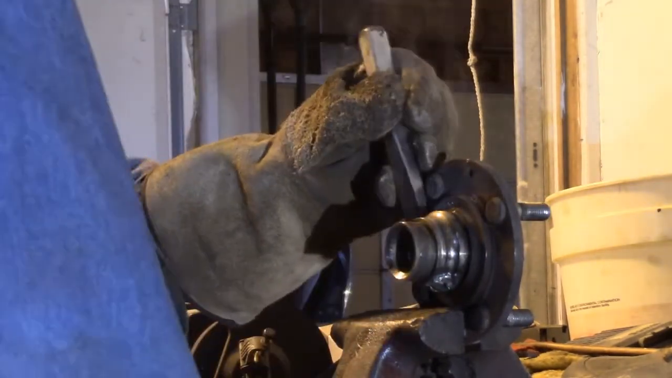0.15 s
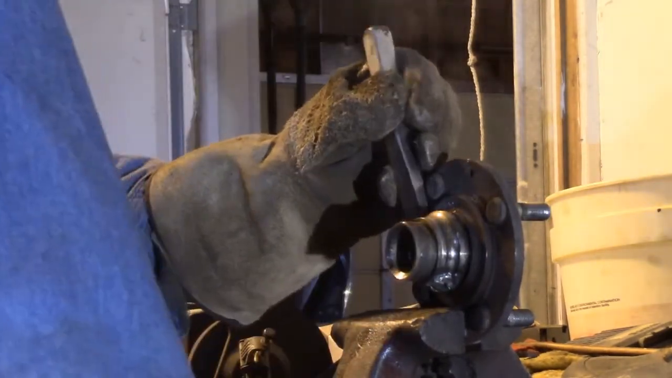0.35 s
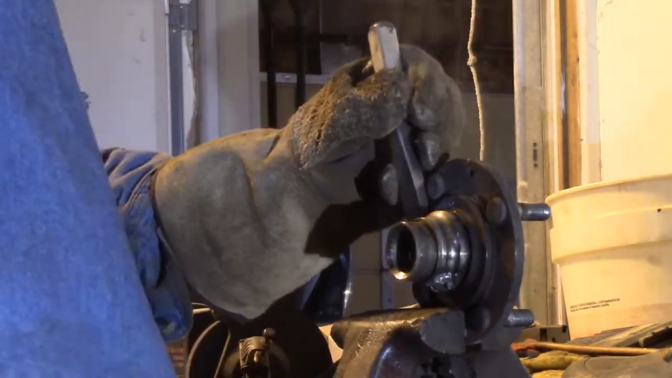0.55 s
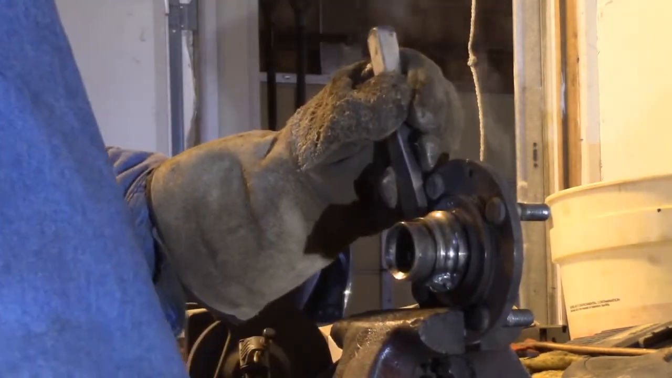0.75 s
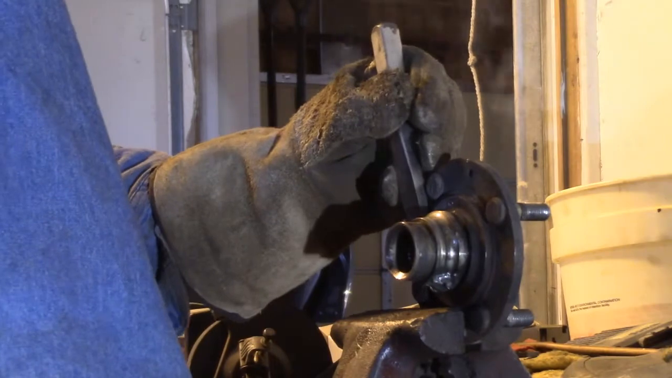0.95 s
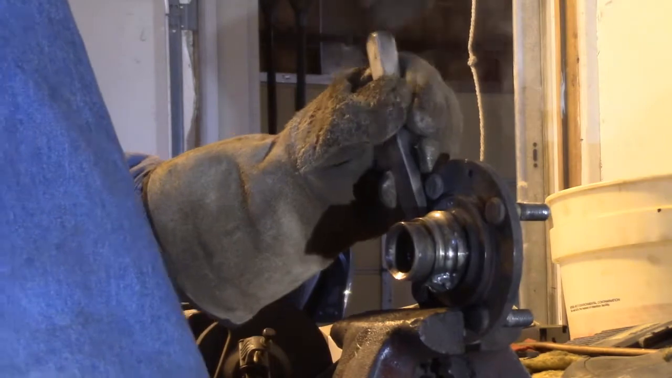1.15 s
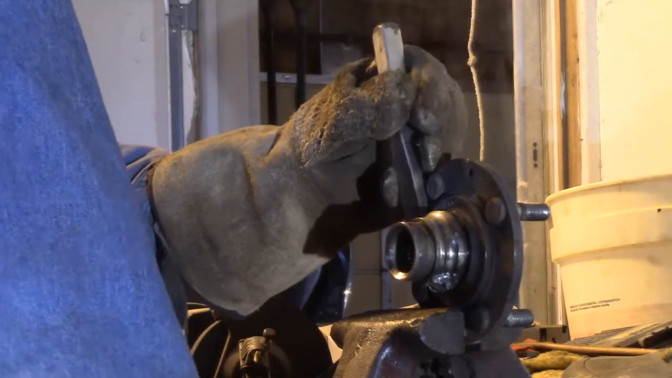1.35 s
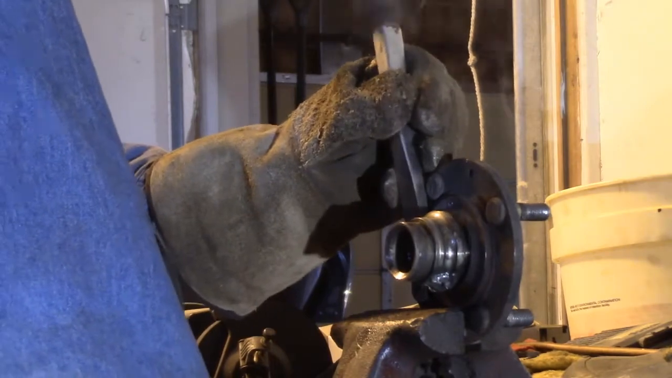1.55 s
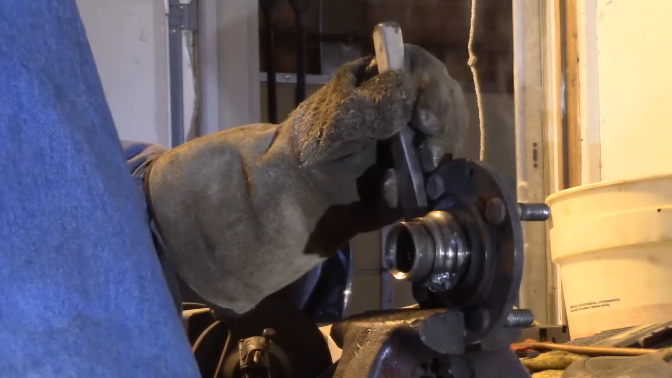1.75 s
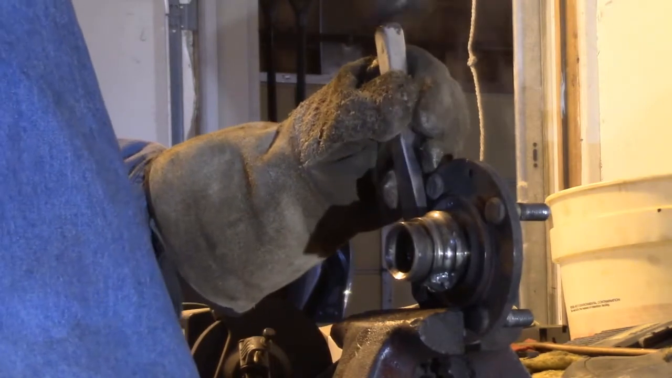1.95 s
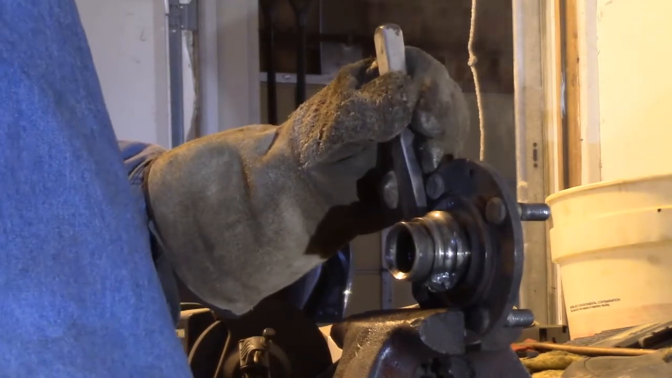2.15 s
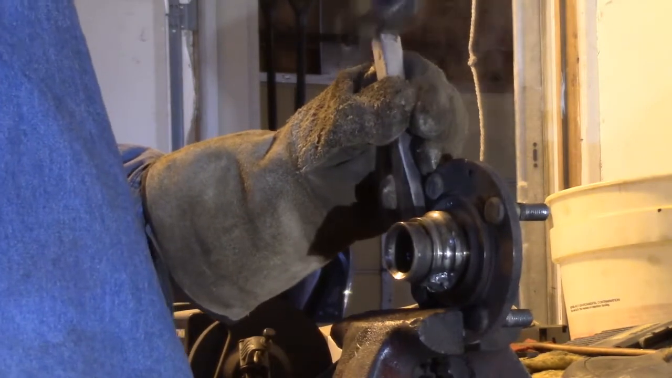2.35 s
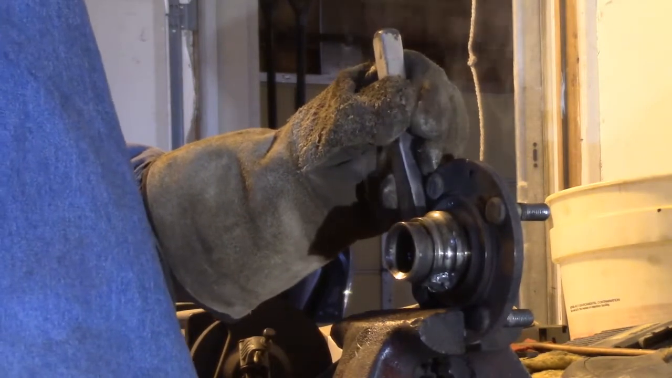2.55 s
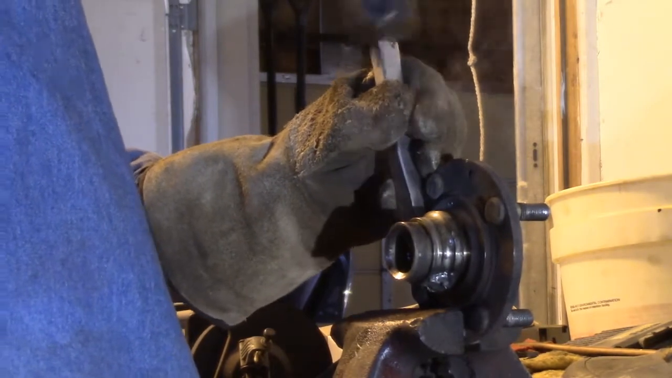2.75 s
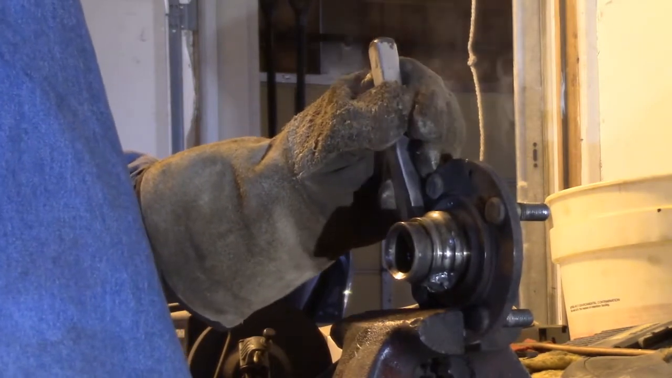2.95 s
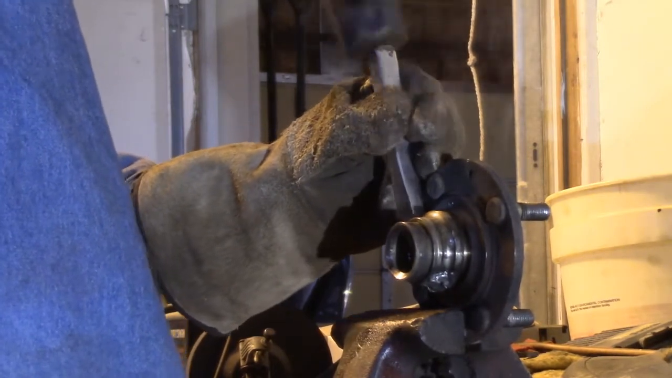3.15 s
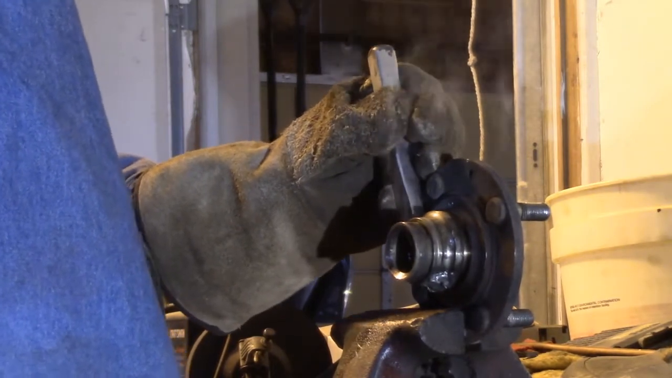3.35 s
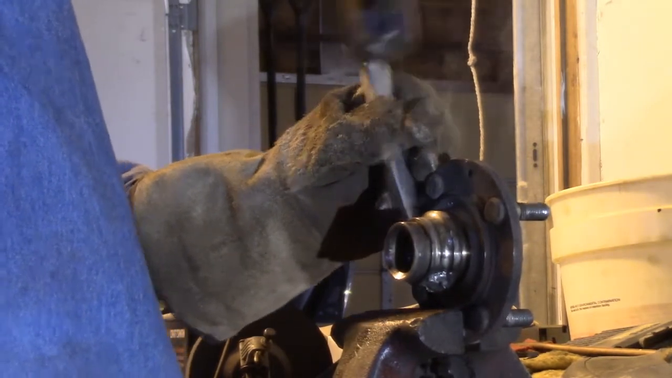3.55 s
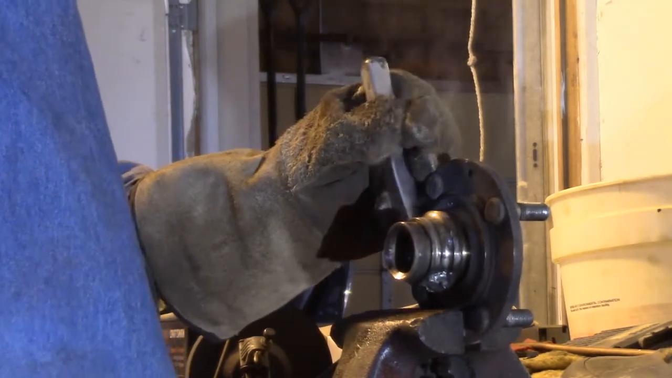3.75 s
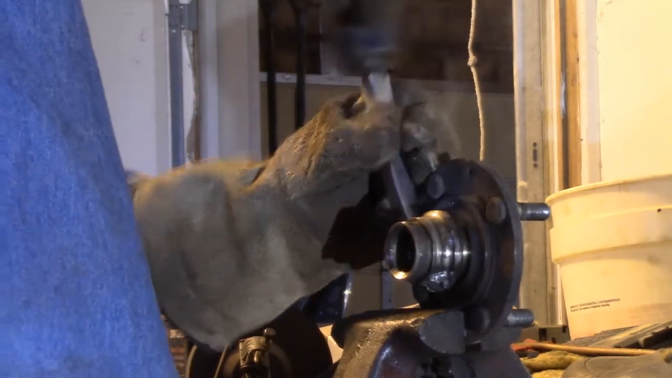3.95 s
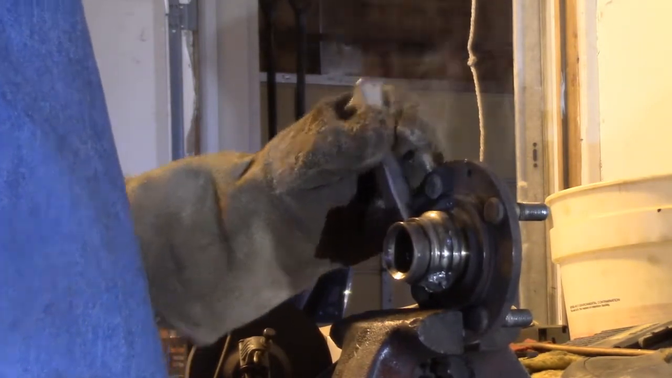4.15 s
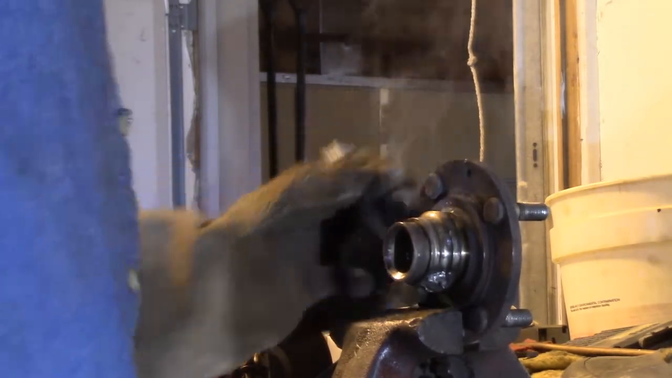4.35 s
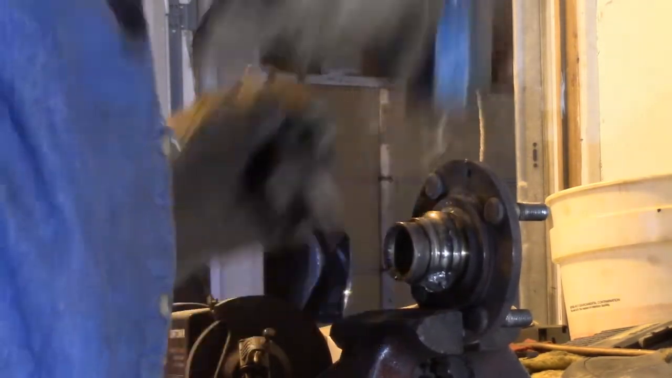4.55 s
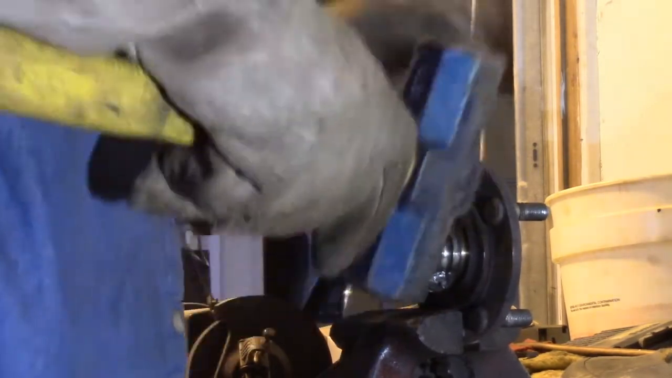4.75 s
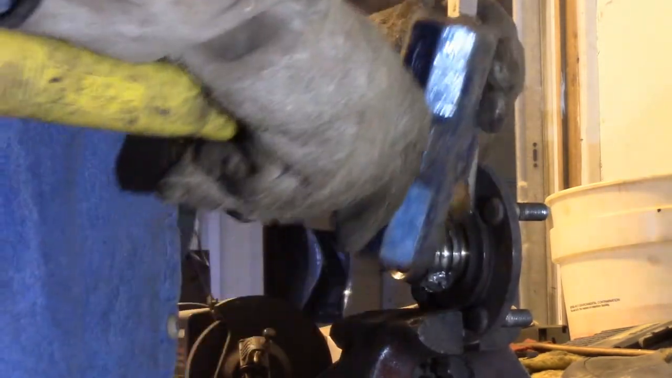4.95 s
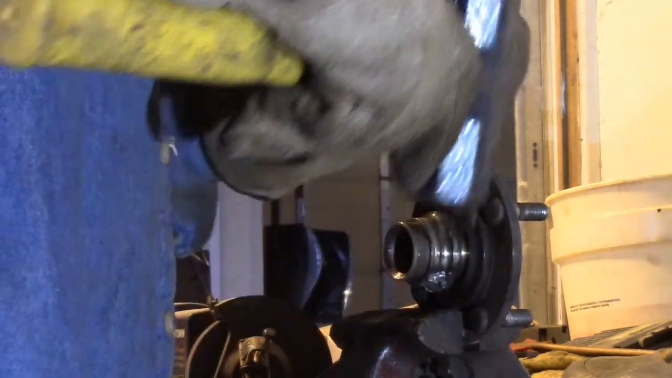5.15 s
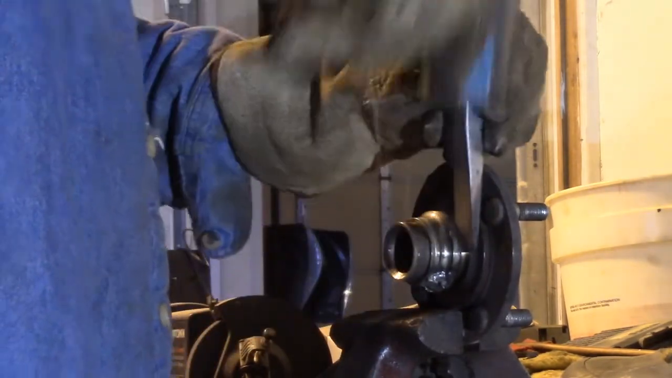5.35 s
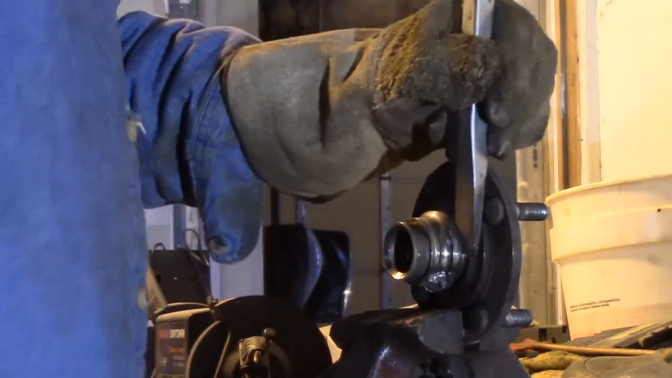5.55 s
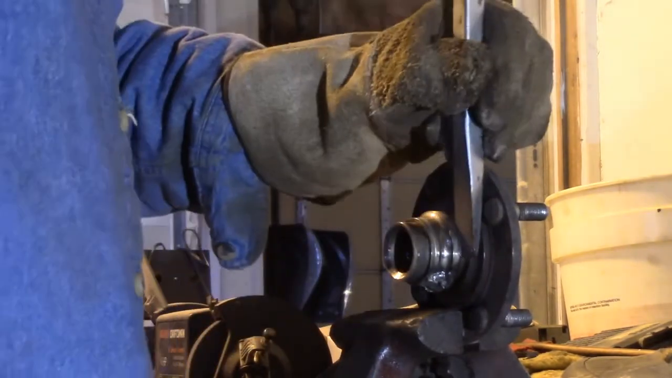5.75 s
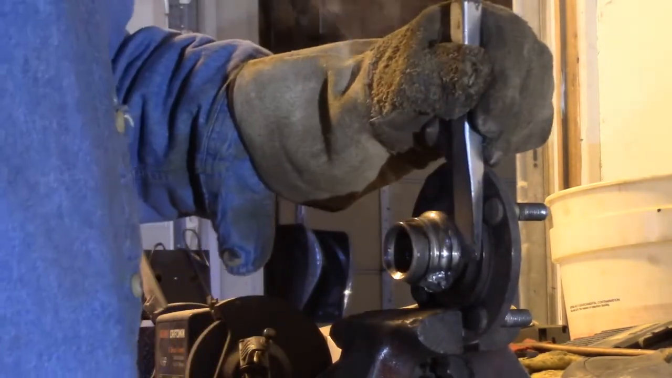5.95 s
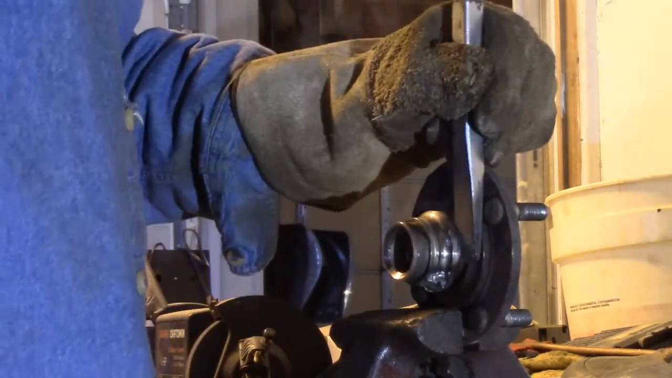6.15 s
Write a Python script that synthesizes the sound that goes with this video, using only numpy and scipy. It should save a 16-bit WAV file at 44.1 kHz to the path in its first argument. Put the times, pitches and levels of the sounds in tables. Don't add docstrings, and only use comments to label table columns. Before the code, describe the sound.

A quiet garage with microphone hiss and faint lamp hum. From about 0.3 s a hammer strikes a steel chisel on a bearing part clamped in a vice: ten hard, close cracks roughly 0.4 s apart until 3.9 s. Each has a brief bright chisel ring, varying hub clang and high hammer ping, a bench thump and dense room echo lasting around half a second. The ring climbs in pitch as the tip wedges in, and the thump lessens. At 4.3-4.4 s the tip scrapes and slips off with dull glove scuffs; a sleeve rustles near 4.6 s. The tool knocks and rings at 4.8 s, the echo is abruptly cut at 4.94 s, then a tap at 5.04 s sets it again, with soft bumps and a cloth rub near 5.2 s. Near quiet follows, then one final sharp, high-ringing blow at 5.8 s. Loud peaks sound compressed and slightly overloaded.

```python
import sys
import numpy as np
from scipy import signal
from scipy.fft import rfft, irfft
from scipy.io import wavfile
from scipy.ndimage import uniform_filter1d

SR = 44100
rng = np.random.default_rng(int(sys.argv[2]) if len(sys.argv) > 2 else 0)


def file_out(sig):
    cols = np.atleast_2d(sig).T
    lim = np.clip(cols, -1, 1)
    pcm = np.round(lim * 32767).astype(np.int16)
    wavfile.write(sys.argv[1], SR, pcm)


def rack_gain(trim_db):
    fader = np.asarray(trim_db, float)
    return 10 ** (fader / 20)


N = 273861
LOOSE_HZ = 4760
ECHO_SETS = 3


# (time [s], peak level [dB], chisel ring [Hz], hub clang [dB], hammer ping [dB])
BLOWS = [(0.275, -11.5, 4930, -8, 10), (0.685, -7, 4840, 3, 20), (1.091, -7.5, 4830, -6, 9),
         (1.51, -7.5, 5230, 13.5, 21.5), (1.912, -5.5, 5448, 4, 5), (2.32, -6, 5640, -13, -7),
         (2.721, -5, 5760, 4, 10.5), (3.121, -5.5, 5990, -20, 26), (3.524, -5.5, 6340, -14, 8),
         (3.934, -7, 6360, -15, 22.5), (5.813, -11, 6480, 9, 1)]


def blows():
    near, far = np.zeros(N), np.zeros((ECHO_SETS, N))
    for k, blow in enumerate(BLOWS):
        s, db, chisel_hz = blow[:3]
        wedge = np.log2(chisel_hz / LOOSE_HZ)
        force, rattle = seated([contact(0.0053), contact(0.013)], wedge)
        top_hz = 10860 * 2 ** (0.24 * wedge + 0.059 * rng.standard_normal())

        steel, thump = hammer(force, blow, wedge, top_hz, heard_db=-1.5)
        add(near, s, rack_gain(db + 28) * (steel + race_edge(force, wedge) + rack_gain(-22) * thump))

        steel, thump = hammer(rattle, blow, wedge, top_hz)
        room_db = 1.26 + 0.5 * wedge
        add(far[k % ECHO_SETS], s, rack_gain(db + room_db + 28.5) * (steel + thump))
    fist_shade = signal.butter(2, 9170, fs=SR, output="sos")
    return signal.sosfilt(fist_shade, near), far


def hammer(force, blow, wedge, top_hz, heard_db=0):
    s, db, chisel_hz, clang_db, ping_db = blow
    crack = rack_gain(7.5) * band(force, 597, 3665) + rack_gain(7) * band(force, 2610, 9000)
    steel = crack + chisel(force, chisel_hz, top_hz, ping_db)
    steel = steel + hub(force, clang_db) + hammer_head(force, ping_db + heard_db)
    return steel, bench(force, wedge)


def chisel(force, chisel_hz, top_hz, ping_db):
    gripped = np.exp(-((chisel_hz - 5530) / 250) ** 2)
    shank_db = -12.5 - 0.23 * ping_db - 25.5 * gripped
    main = rack_gain(-21 + 0.18 * ping_db) * ring(force, chisel_hz, 0.009)
    shank = rack_gain(shank_db) * ring(force, 8130, 0.0063)
    tip = rack_gain(-20.5) * ring(force, top_hz, 0.012)
    return main + shank + tip


# (frequency [Hz], level [dB], time to fall 60 dB [s])
HUB_MODES = [(820, -32, 0.044), (1370, -29, 0.02), (2430, -50, 0.03), (3420, -34, .02), (1790, -24, 0.03),
             (5450, -36, .04)]


def hub(force, clang_db):
    clang = rack_gain(clang_db - 18.5) * struck(force, HUB_MODES, spread_db=2)
    thin_tone_db = -41 - 0.57 * np.clip(clang_db, -12, 12)
    return clang + rack_gain(thin_tone_db) * ring(force, 3862, 0.064)


# (frequency [Hz], level [dB], time to fall 60 dB [s])
HEAD_MODES = [(9895, -37, 0.16), (10800, -46, 0.15), (9440, -43, 0.06), (11120, -56, 0.052),
              (11850, -44, 0.05), (11740, -44, .05), (12900, -34, 0.08)]


def hammer_head(force, ping_db):
    upper = [(hz * rng.uniform(0.975, 1.025), db, t60) for hz, db, t60 in HEAD_MODES[1:]]
    return rack_gain(ping_db - 9) * struck(force, HEAD_MODES[:1] + upper, spread_db=4)


# (frequency [Hz], level [dB], time to fall 60 dB [s])
BENCH_MODES = [(135, -44.5, 0.011), (210, -21, 0.16), (304.6, -34, 0.093), (385.4, -18.5, 0.072),
               (524, -15, 0.017)]


def bench(force, wedge):
    thump_db = -8.5 * wedge
    body = rack_gain(thump_db - 13.0) * struck(force, BENCH_MODES, spread_db=0.93)
    return rack_gain(thump_db + 15.5) * band(force, 54, 979) + body


def race_edge(force, wedge):
    bite = np.clip(wedge / 0.35, 0, 1)
    return rack_gain(-17 + 5.5 * bite) * ring(force, 3420, 0.003)


def seated(forces, wedge):
    grain_hz = 350
    hz = np.fft.rfftfreq(8192, 1 / SR)
    knots = np.arange(0, SR / 2 + grain_hz, grain_hz)
    patches = rng.standard_normal(len(knots)) * np.minimum(knots / 4000, 1)
    valley = np.exp(-((hz - 6630) / 200) ** 2 - max(wedge, 0) / 0.067)
    log_gain = np.log(rack_gain(2.0 * np.interp(hz, knots, patches) - 8.5 * valley))
    cepstrum = irfft(log_gain) * np.r_[1, np.full(4095, 2), 1, np.zeros(4095)]
    gain = np.exp(rfft(cepstrum))
    return [np.pad(irfft(rfft(force[:8192]) * gain), (0, len(force) - 8192)) for force in forces]


def contact(chatter_s, length=8192):
    fade = np.exp(-np.arange(length) / SR / chatter_s)
    lines = rfft(rng.standard_normal(length) * fade)
    power = uniform_filter1d(np.abs(lines) ** 2, size=round(length / SR / chatter_s / 4))
    return np.pad(irfft(lines / np.sqrt(power))[:length // 2], (0, SR // 4))


def struck(force, modes, spread_db):
    return sum(rack_gain(db + spread_db * rng.standard_normal()) * ring(force, hz, t60) for hz, db, t60 in modes)


def ring(force, hz, t60):
    r = rack_gain(-60 / (max(t60, .005) * SR))
    w = 2 * np.pi * hz / SR
    return signal.lfilter([0, np.sin(w)], [1, -2 * r * np.cos(w), r * r], force + 1e-18)


def band(x, lo_hz, hi_hz):
    return signal.sosfilt(signal.butter(2, [lo_hz, min(hi_hz, .45 * SR)], "band", fs=SR, output="sos"), x)


def add(track, s, sound):
    i = round(s * SR)
    track[..., i:i + sound.shape[-1]] += sound[..., :N - i]


def touches(events, modes, chatter_s, ring_db, crack_db, room_db):
    out = np.zeros(N)
    pairs = modes + [(hz * 1.008, db - 6, t60 * .4) for hz, db, t60 in modes]
    for s, db, dull in events:
        dull = np.clip(dull, 0, .95)
        force = np.pad(contact(chatter_s), (0, SR // 4))
        force = signal.lfilter([1 - dull], [1, -dull], force)
        rings = rack_gain(ring_db) * struck(force, pairs, spread_db=1)
        add(out, s, rack_gain(db) * (rings + rack_gain(crack_db) * band(force, 267, 6400)))
    out = band(out, 250, 9900)
    return np.array([out, rack_gain(room_db) * out])


# (time [s], peak level [dB], dullness [0-1])
DRAG = [
    (4.3563, -14, .3),
]
# (frequency [Hz], level [dB], time to fall 60 dB [s])
DRAG_MODES = [(1430, -1, 0.11), (1940, -1, .025), (2790, 8.5, 0.012), (3225, -2, 0.055), (4230, 7, 0.009),
              (6280, -7, 0.097), (7700, -20.5, .02), (11380, -14, 0.24)]


def drag():
    return touches(DRAG, DRAG_MODES, 0.0024, ring_db=-8, crack_db=12.0, room_db=9.5)


# (time [s], peak level [dB], dullness [0-1])
SLIP = [
    (4.4125, -26, .2),
    (4.4168, -14, .45),
]
# (frequency [Hz], level [dB], time to fall 60 dB [s])
SLIP_MODES = [(1410, -1.5, 0.026), (1940, 3, 0.024), (2740, 2, 0.028), (3000, 1.5, 0.078),
              (6200, -16.5, .04), (11300, -9, 0.11)]


def slip():
    return touches(SLIP, SLIP_MODES, 0.0017, ring_db=-8, crack_db=8.4, room_db=2.5)


# (time [s], peak level [dB], dullness [0-1])
KNOCK = [
    (4.828, -9, .3),
]
# (frequency [Hz], level [dB], time to fall 60 dB [s])
KNOCK_MODES = [(880, -8, 0.034), (2290, -15, 0.024), (4140, 0, 0.04), (4597, -6, 0.15), (5670, -17.5, .1),
               (6300, -11, .03), (8360, -4, .03), (9496, -21, 0.144), (11300, -15, 0.12), (383.3, -11, 0.5),
               (3390, -3, 0.04), (3860, -2, 0.32)]


def knock():
    return touches(KNOCK, KNOCK_MODES, 0.0082, ring_db=-5, crack_db=20.6, room_db=9.7)


# (time [s], peak level [dB], dullness [0-1])
TAP = [
    (5.0355, 0, .2),
]
# (frequency [Hz], level [dB], time to fall 60 dB [s])
TAP_MODES = [(369, -6.5, 0.103), (880, -29, 0.045), (1430, -3.5, 0.085), (1770, -11, 0.035),
             (2330, 5.5, 0.0079), (3139, -8.5, 0.5), (3146, 10.5, 0.036), (4474, -37, 0.044),
             (5453, -37, .06), (8250, 5.5, 0.0645), (9360, -24, .06), (11240, -17.5, 0.39)]


def tap():
    return touches(TAP, TAP_MODES, 0.003, ring_db=-14, crack_db=18.3, room_db=6.5)


# (time [s], peak level [dB], dullness [0-1])
SCUFF = [
    (4.318, -19.5, 0.68),
    (4.385, -27.5, 0.1),
    (4.404, -22, 0.4),
    (4.846, -22.5, 0.4),
    (4.858, -17, 0.93),
    (5.06, -17, 0.05),
    (5.24, -20.5, 0.93),
    (5.425, -46, 0),
    (5.44, -50, 0.45),
    (5.575, -68, .05),
]
# (frequency [Hz], level [dB], time to fall 60 dB [s])
SCUFF_MODES = [(414, -1.5, 0.051), (690, 12, 0.008), (854, -1, 0.028), (1920, -19, 0.088), (8100, -6, 0.03)]


def scuffs():
    return touches(SCUFF, SCUFF_MODES, 0.0052, ring_db=-5.5, crack_db=22, room_db=14.6)


# (loudest time [s], level [dB], rise [dB/s], hold [s], fall [dB/s])
SLEEVE = [
    (4.583, -33, 113, 0.125, 229),
    (5.188, -36.5, 334, 0.094, 88),
]
# (frequency [Hz], level [dB])
RUSTLE = [(2500, -3.5), (4500, 5), (7000, -4), (9500, -3), (12000, 0), (14000, 4), (15500, -30)]


def sleeve():
    t = np.arange(N) / SR
    rubs = np.zeros(N)
    for s, db, rise, hold, fall in SLEEVE:
        rubs += rack_gain(db - rise * np.maximum(s - t, 0) - fall * np.maximum(t - s - hold, 0))
    grain = rack_gain(0.99 * np.repeat(rng.standard_normal(N // 128 + 1), 128)[:N])
    return shaped_noise(RUSTLE) * grain * rack_gain(-9.5) * rubs


# (frequency [Hz], time to fall 60 dB [s], build-up [s], level [dB], left-right likeness [0-1])
GARAGE = [(59, 0.75, 0.014, -29.5, .8), (143.3, 0.5, 0.006, -5.5, 0.95), (338, 0.79, 0.0056, 0, 0.9937),
          (1020, 0.71, 0.0044, 1.5, .96), (2080, 0.75, 0.0011, 2.5, 0.94),
          (5000, 0.61, 0.00067, -6.5, 0.89), (8500, 0.42, 0.0056, -8.5, 0.81),
          (12000, 0.15, 0.00414, -16.5, 0.23)]


def garage(x):
    t = np.arange(SR) / SR
    echo = 0
    for hz, noise in bands(SR):
        build = 1 - np.exp(-t / max(at_hz(GARAGE, hz, column=2), 1e-3))
        decay_db = at_hz(GARAGE, hz, column=3) - 60 * t / at_hz(GARAGE, hz)
        echo = echo + noise * build * rack_gain(decay_db)
    return signal.fftconvolve(x[None], echo / np.sqrt(SR), axes=1)[:, :N]


def bands(length):
    edges = 35 * 2 ** np.arange(0, 8.9, 1 / 3)
    white = rng.standard_normal((2, 2, length))
    for k, (lo_hz, hi_hz) in enumerate(zip(edges, edges[1:])):
        hz = np.sqrt(lo_hz * hi_hz)
        mid, side = band(white[k % 2], lo_hz, hi_hz)
        alike = np.clip(at_hz(GARAGE, hz, column=4), 0, 1)
        yield hz, np.sqrt(1 + alike) * mid + np.sqrt(1 - alike) * side * [[1], [-1]]


def at_hz(points, hz, column=1):
    return np.interp(np.log(hz), np.log(np.array(points)[:, 0]), np.array(points)[:, column])


def shaped_noise(spectrum):
    out = sum(rack_gain(at_hz(spectrum, hz)) * noise for hz, noise in bands(N))
    return out / np.sqrt(np.mean(out ** 2))


# (frequency [Hz], level [dB per Hz])
FLOOR = [(18, -72), (30, -25), (111, -6.5), (786, -5.5), (849, -17), (1250, -12), (1350, -1), (1700, -15.5),
         (2700, -13.5), (7950, -24), (11100, -27), (14000, -34)]
# (frequency [Hz], level [dB rms])
HUM = [(360.7, -59.5), (839.8, -55), (1319, -59), (1443, -58.5), (1561, -88), (2159, -63), (2762, -63),
       (3122, -101), (3720, -65), (4081, -75.5)]


def background():
    t = np.arange(N) / SR
    hum = sum(np.sqrt(2) * rack_gain(db) * np.sin(2 * np.pi * (hz * t + rng.random())) for hz, db in HUM)
    return rack_gain(-48) * shaped_noise(FLOOR) + hum


def scene():
    near, far = blows()
    touch_near, touch_far = drag() + slip() + scuffs() + knock() + tap()
    far = rack_gain(18.0) * far
    far[0] += touch_far
    wet = sum(garage(feed) for feed in far)
    balance = rack_gain(np.array([[-.3], [.3]]))
    return (near + touch_near) * balance + wet + sleeve() + background()


def limiter(x, top_db, attack_s, release_db_per_s):
    ramp = release_db_per_s * np.arange(N) / SR
    level = 20 * np.log10(np.abs(x).max(axis=0) + 1e-9)
    over = np.maximum(np.maximum.accumulate(level + ramp) - ramp - top_db, 0)
    r = np.exp(-1 / (attack_s * SR))
    late = np.pad(over, (round(0.003 * SR), 0))[:N]
    return x * rack_gain(-signal.lfilter([1 - r], [1, -r], late))


def smear(lead_s, under_db):
    gate, t = np.zeros(N), np.arange(N) / SR
    attacks = [(row[0], 0) for row in BLOWS]
    attacks += [(s, db - 6) for s, db, dull in KNOCK + TAP]
    attacks += [(6.225, -4)]
    for s, db in attacks:
        gate += rack_gain(db) * np.clip(1 - (s - t) / lead_s, 0, 1) ** 1.54 * (t < s)
    hiss = rng.standard_normal(N) + 2.6 * rng.standard_normal((2, N))
    return rack_gain(under_db) * gate * band(hiss, 500, 10000)


# (frequency [Hz], level against the moment's mean [dB])
DROPPED = [(7500, -79), (8500, -12.5), (9500, -22.5), (11000, -15.5), (13000, -18.5), (14200, -14.5),
           (15000, 21.5)]


def thin_top(x, whim_db):
    hz, _, lines = signal.stft(x, SR, "cosine", nperseg=2048)
    power = np.abs(lines) ** 2
    shared = rng.standard_normal((129, power.shape[2]))
    own = rng.standard_normal((2, 129, power.shape[2]))
    whim = np.repeat(shared + 0.43 * own, 8, axis=1)[:, :len(hz)]
    whim = uniform_filter1d(whim, size=3, axis=2)
    bar_db = at_hz(DROPPED, hz + 1)[:, None] + whim_db * whim
    kept = uniform_filter1d(power, size=5, axis=1) > power.mean(axis=(0, 1)) * rack_gain(2 * bar_db)
    return signal.istft(lines * kept, SR, "cosine", nperseg=2048)[1][:, :N]


# (left [Hz], right [Hz])
TOP_END_HZ = [10670, 12000]


def dull_top(x):
    filters = [signal.butter(4, hz, fs=SR, output="sos") for hz in TOP_END_HZ]
    return np.array([signal.sosfilt(sos, side) for sos, side in zip(filters, x)])


def band_limit(x):
    return signal.sosfilt(signal.butter(12, 14910, fs=SR, output="sos"), x)


def record(dry):
    x = signal.sosfilt(signal.butter(3, 80, "high", fs=SR, output="sos"), dry)
    x = limiter(x, top_db=4.5, attack_s=0.0012, release_db_per_s=95)
    overload = 0.87
    x = np.tanh(rack_gain(-4.5) * x / overload) * overload
    x = dull_top(x + smear(lead_s=0.031, under_db=-28))
    since = np.arange(N) / SR - 4.9438
    x = x * np.where(since < 0, 1, np.clip((since - 0.002) / 0.0097, 0.02, 1))
    x = thin_top(x, whim_db=8.0)
    x = signal.sosfilt(signal.butter(2, 60, "high", fs=SR, output="sos"), x)
    return band_limit(x)


dry = scene()
out = record(dry)
file_out(out)
```